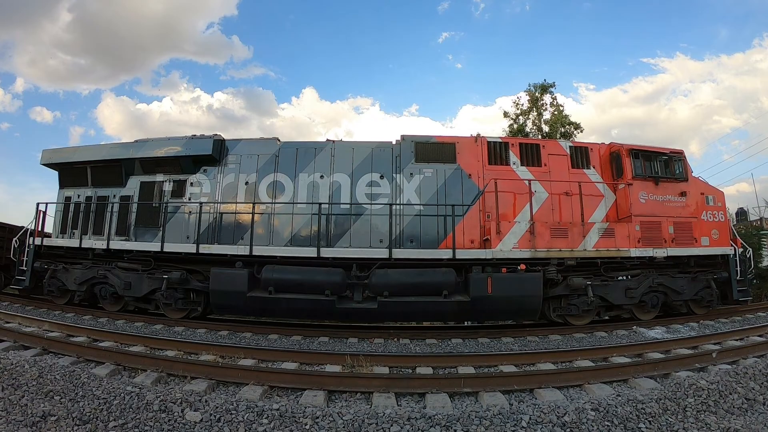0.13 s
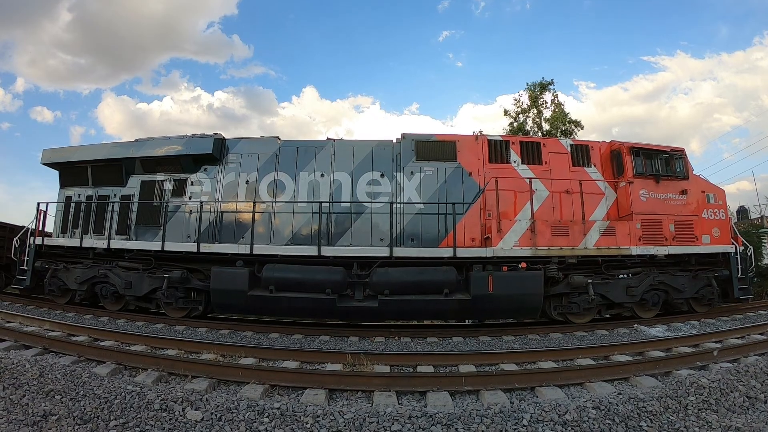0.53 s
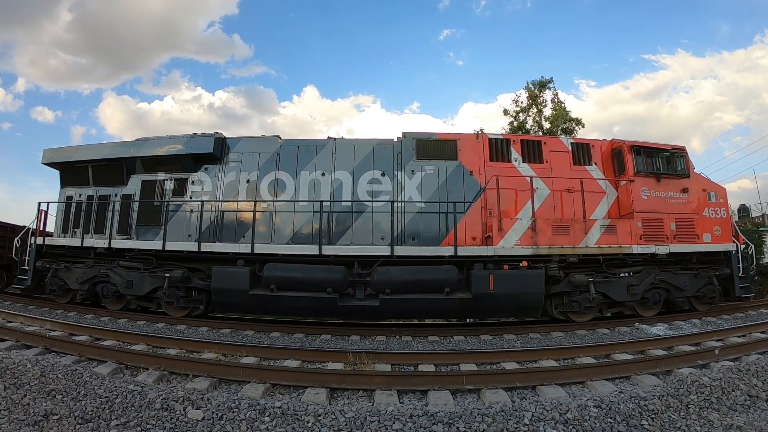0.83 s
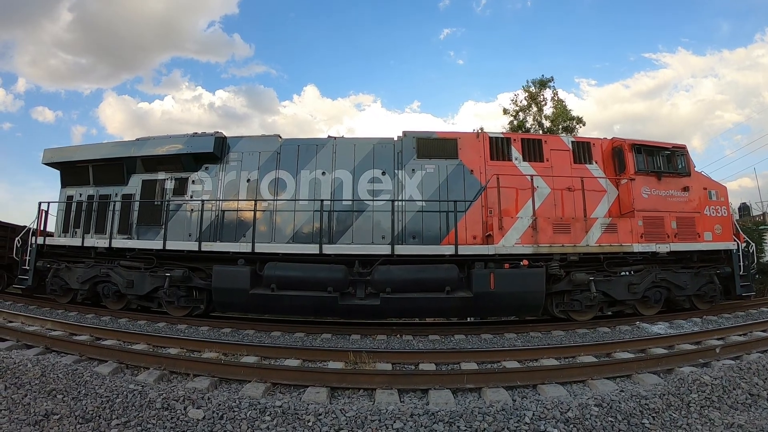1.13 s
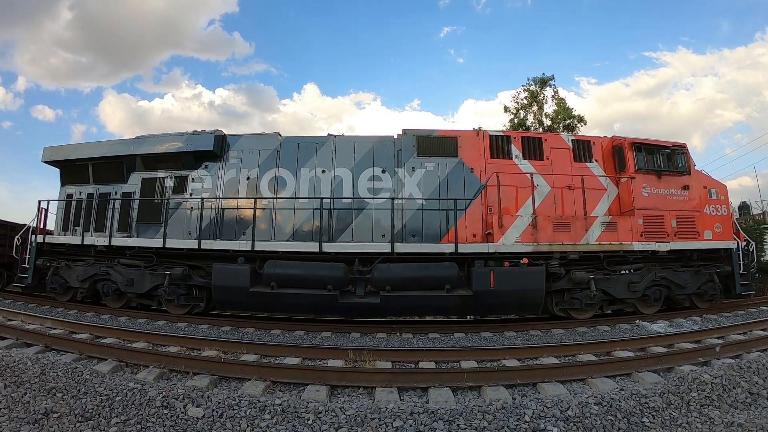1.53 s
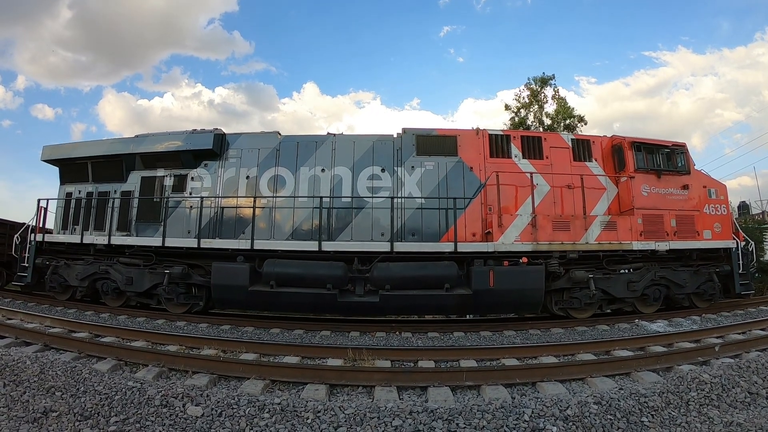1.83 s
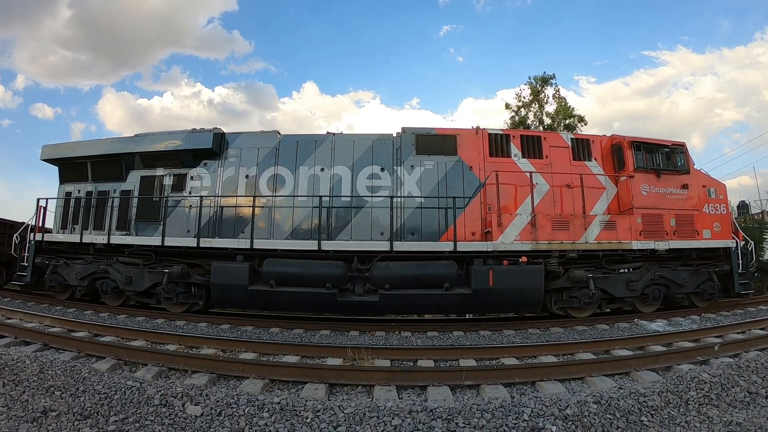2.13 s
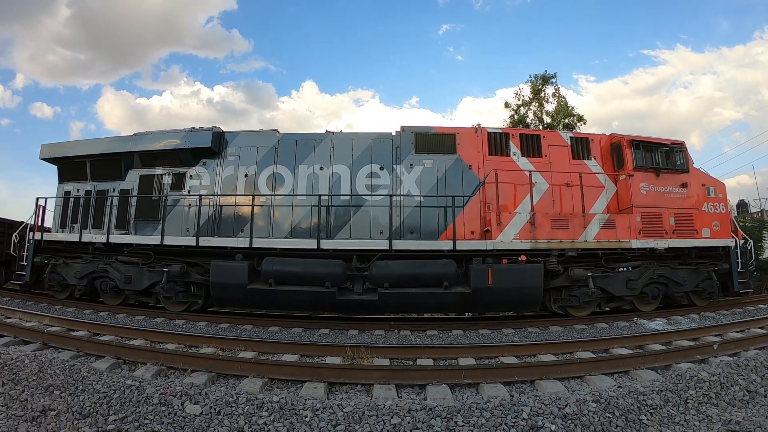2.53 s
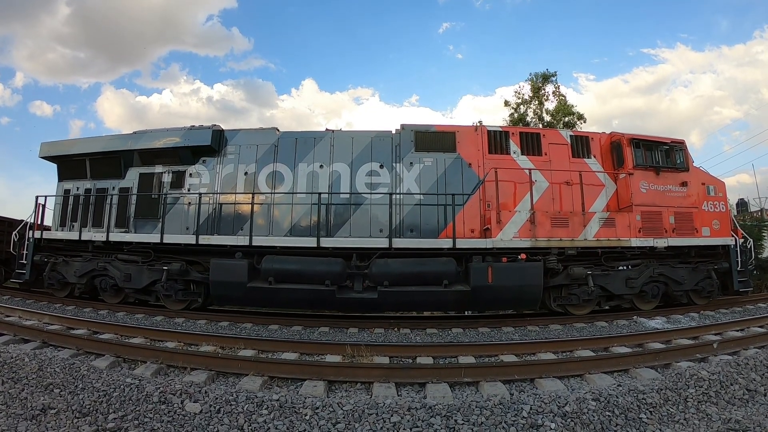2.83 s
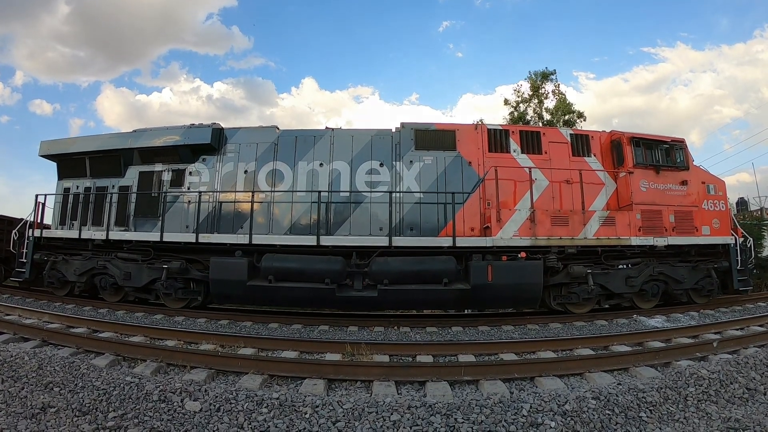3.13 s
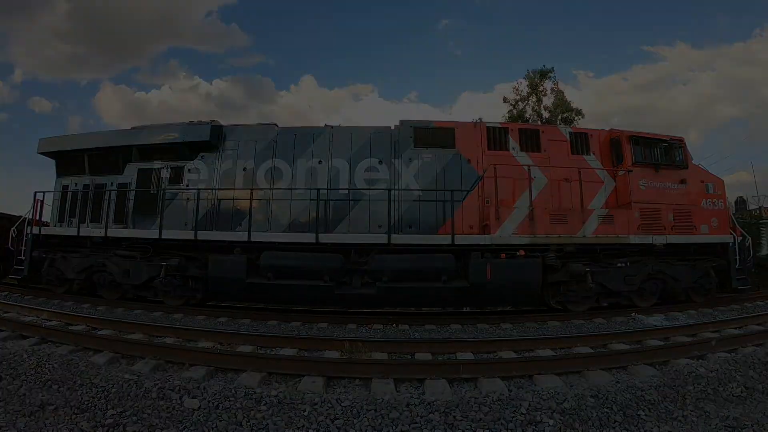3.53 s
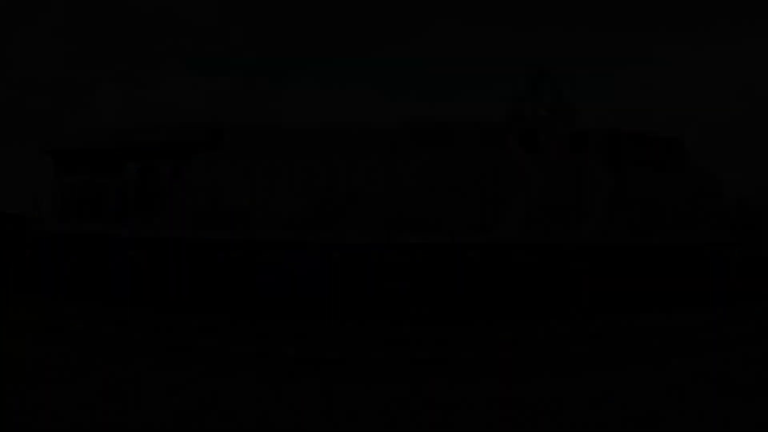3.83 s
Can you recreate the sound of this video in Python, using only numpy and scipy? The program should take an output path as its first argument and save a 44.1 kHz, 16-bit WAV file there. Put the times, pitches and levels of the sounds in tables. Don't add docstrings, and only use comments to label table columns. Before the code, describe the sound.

A diesel locomotive idles some metres away in an open rail yard. A loud compressed-air hiss sags and shuts off within half a second, leaving deep thrum, fan roar, valve clatter and wind thumps before a fade-out.

```python
import sys
import numpy as np
from scipy import signal
from scipy.fft import rfft, irfft
from scipy.io import wavfile
from scipy.ndimage import uniform_filter1d

SR = 44100
rng = np.random.default_rng(int(sys.argv[2]) if len(sys.argv) > 2 else 0)


def convert_level_to_amplitude(level_db):
    exponent = np.asarray(level_db, float) / 20
    return 10 ** exponent


def output_pcm(signal):
    pcm = np.clip(np.atleast_2d(signal).T, -1, 1) * 32767
    wavfile.write(sys.argv[1], SR, np.round(pcm).astype(np.int16))


N = 176400

CYCLE_HZ = 2.792

# freq_hz, density_db [dB per Hz]
AIR_COLOUR = [(290, -59), (500, -29), (956, -3), (2010, -6.5), (2310, -1.5), (2840, -11), (4870, -16.5),
              (11900, -45.5), (13500, -51.5)]
# freq_hz, width_hz, level_db
AIR_PIPE_MODES = [(951, 86, 4), (1122, 100, -7), (1496, 80, -3.5), (2287, 76, -0.5), (3400, 210, -7),
                  (3733, 45, -9.5), (4120, 49, -14), (4750, 130, -11), (6500, 48, -26), (6980, 53, -25)]
# time_s, pitch_hz, level_db
STACK_TONE = [(0, 54.5, -23), (.24, 52.43, -19), (.41, 52.23, -15), (.62, 52.47, -21.5), (.98, 51.5, -19),
              (1.25, 53.5, -19), (1.45, 53.02, -16), (1.6, 51.6, -21), (1.76, 52.16, -16),
              (1.881, 55.9, -28), (2.0, 52.75, -18.5), (2.16, 50.4, -22), (2.5, 53.12, -21),
              (2.84, 51.53, -19.5), (3.089, 50.5, -24.5), (3.3, 51.27, -20), (3.64, 52.3, -20),
              (4, 52, -25)]
# time_s, depth_db
TONE_LULLS = [(.34, -7), (.5, 0), (.58, -8), (.72, -9), (.84, -12), (.95, -15), (1.03, -11), (1.09, -9),
              (1.2, -8), (1.35, -10), (1.43, -13), (1.61, -11), (1.67, -10), (1.8, -10.5), (1.95, -6),
              (2.09, -13), (2.25, -7), (2.36, -12), (2.7, -12), (3.01, -14), (3.18, -11), (3.57, -7),
              (3.75, -8)]
# freq_hz, width_hz, level_db
STACK_MODES = [(34.7, 6, -10), (103.4, 25, -3.5), (245, 132, -9.5)]
# time_s, level_db
ROAR_LEVEL = [(.5, -35.5), (.7, -35), (1.0, -32.5), (1.15, -36.5), (1.57, -38.5), (2.0, -36), (2.3, -33.5),
              (2.6, -36), (2.91, -40), (3.2, -36.5), (3.45, -38), (3.62, -38), (3.75, -43), (4, -42)]
# freq_hz, density_db [dB per Hz]
HOOD_COLOUR = [(240, -17.5), (400, -1), (550, -9), (692, 1.5), (1030, -0.5), (1270, -9), (1550, -1.5),
               (1720, -7.5), (2100, -26.5), (2730, -48), (4620, -120)]
# freq_hz, width_hz, level_db
PANEL_MODES = [(734, 8.4, -20.5), (861, 10, -18.5), (1048.5, 6.1, -11), (1710, 43, -14.5), (1692, 32, -15)]
# freq_hz, density_db [dB per Hz]
CLATTER_COLOUR = [(1060, -28), (1800, -8), (2060, -5.5), (2360, -4.5), (3220, -6.5), (4910, -13.5),
                  (5620, -18.5), (8140, -31.5), (13500, -80)]
# time_s, lift_db
CLATTER_LIFT_DB = [(.5, 0.5), (.8, -0.5), (1.0, -2.5), (1.3, 0), (1.65, -1), (1.9, 0), (2.2, 0), (2.5, 0.5),
                   (2.9, -1.5), (3.3, 2.5), (3.6, 1), (3.85, -2)]
# freq_hz, width_hz, level_db
STRUCK_PARTS = [(2350, 110, -59), (4800, 250, -65), (3300, 250, -69)]
# multiple [of the gear rate], level_db
GEAR_PARTIALS = [(3, 0), (8, -36), (12, -44), (13, -37), (14, -42), (15, -46), (18, -56), (20, -60)]
# time_s, level_db
WHINE_LEVEL = [(.5, -46.5), (1.0, -46), (1.4, -40.5), (1.53, -45), (1.62, -42), (1.85, -43), (2.05, -39.5),
               (2.24, -51), (2.5, -43.5), (2.72, -47.5), (2.85, -41), (3.02, -42.5), (3.2, -36),
               (3.38, -45.5), (3.65, -46.5), (4, -50.5)]
# time_s, gust_db
GUST_LEVEL = [(0, -30), (.24, -28), (.42, -33.5), (.54, -25.5), (.7, -26.5), (.95, -28), (1.19, -19),
              (1.6, -28.5), (1.86, -25.5), (2.0, -29.5), (2.3, -27.5), (2.45, -22.5), (2.7, -25.5),
              (3.1, -33), (3.27, -35.5), (3.4, -24.5), (3.75, -28), (3.92, -37.5)]
# freq_hz, density_db [dB per Hz]
WIND_COLOUR = [(7.1, -36.5), (12, -8), (43, 0), (59, -1), (119, -8), (182, -20.5), (240, -19), (544, -38),
               (600, -42.5), (780, -67), (1320, -120)]
# time_s, peak_db, pitch_hz
WIND_PUFFS = [(0.061, -21.5, 72.6), (0.091, -23, 119), (.2, -20, 75), (.3, -19.5, 68.6), (1.54, -21.5, 135),
              (2.85, -22, 135), (.53, -11.5, 99), (0.659, -26, 119), (0.799, -17, 113), (.91, -18.5, 91),
              (1.151, -13.5, 75.5), (1.189, -27, 134), (1.281, -23, 106), (1.38, -26, 115), (1.5, -20, 100),
              (1.619, -20.5, 95), (1.86, -13.5, 97), (2.12, -27, 85), (2.25, -19.5, 92.6),
              (2.39, -12.5, 71.66), (2.44, -14.5, 100.5), (2.512, -14.5, 75), (2.567, -11, 89.6),
              (2.601, -14, 69.5), (2.781, -21, 109.2), (2.928, -19.5, 99.94), (3.442, -27.5, 75),
              (3.49, -18.5, 84.95), (3.73, -23, 78.5)]
# start_s, level_db, pitch_hz, ring_s [to -60 dB]
NEAR_KNOCKS = [
    (1.976, -20, 290, .03),
    (2.536, -34, 3100, .03),
    (2.271, -40, 3200, .02),
    (1.259, -40, 2800, .025),
    (3.6, -36, 600, .08),
    (.29, -33, 370, .05),
    (1.51, -30, 240, .05),
    (1.27, -30, 240, .06),
    (3.55, -32, 330, .1),
]
# freq_hz, gain_db
MIC_RESPONSE = [(6000, 0), (8100, 2), (9300, -5), (12000, -3.5), (12900, -12.5), (14200, -17), (15200, -32)]


def level(x, db):
    return x * convert_level_to_amplitude(db) / np.sqrt(np.mean(x ** 2))


def ring(x, hz, width_hz):
    b, a = signal.iirpeak(min(hz, .45 * SR), hz / max(width_hz, 1), fs=SR)
    return signal.lfilter(b, a, x)


def ring_twice(x, hz, width_hz):
    return ring(ring(x, hz, width_hz), hz, width_hz)


def noise():
    return rng.standard_normal(N)


def walk(rate_hz):
    hold = int(SR / rate_hz)
    held = np.repeat(rng.standard_normal(N // hold + 2), hold)
    return 1.27 * uniform_filter1d(uniform_filter1d(held, hold), hold)[:N]


def colour(x, points):
    hz, db = np.array(points, float).T
    edges = np.log2(hz)
    octave = np.log2(np.maximum(np.arange(N // 2 + 1) * SR / N, 1))
    outside = np.maximum(edges[0] - octave, 0) + np.maximum(octave - edges[-1], 0)
    return irfft(rfft(x) * convert_level_to_amplitude(np.interp(octave, edges, db) - 30 * outside), N)


def bands(points, flicker_db, rate_hz, per_octave=3):
    spectrum = rfft(level(colour(noise(), points), 0))
    octave = np.log2(np.arange(1, N // 2 + 2) * SR / N)
    low, high = np.log2(points[0][0]) - 1, np.log2(points[-1][0]) + 1
    for centre in np.arange(low, high, 1 / per_octave):
        weight = np.clip(1 - abs(octave - centre) * per_octave, 0, 1)
        yield 2 ** centre, irfft(spectrum * weight, N) * convert_level_to_amplitude(flicker_db * walk(rate_hz))


def turbulence(points, flicker_db, rate_hz):
    return sum(band for _, band in bands(points, flicker_db, rate_hz))


def curve(t, rows):
    return np.interp(t, *np.array(rows, float).T)


def beats(count, scatter_db):
    rate_hz = CYCLE_HZ * count
    times = .053 + np.arange(4.1 * rate_hz) / rate_hz
    draw = 2 * rng.random((400, 3))[:len(times)] - 1
    pattern = draw[np.arange(len(times)) % count, 1]
    size = convert_level_to_amplitude(scatter_db * (draw[:, 0] + pattern))
    at = np.clip((times + .003 * draw[:, 2]) * SR, 0, N + SR).astype(int)
    return np.bincount(at, size, N + 2 * SR)[:N]


def air_valve_db(t, eases_s):
    shuts_s = 0.444
    sag = -12.5 * t
    ease = -47.5 * np.maximum(t - eases_s, 0)
    shut = -500 * np.maximum(t - shuts_s, 0)
    return np.maximum(sag + ease + shut, -120)


def air(t):
    jet = turbulence(AIR_COLOUR, 0.63, 30)
    pipe = sum(level(ring(noise(), hz, width), db) * convert_level_to_amplitude(1.5 * walk(30))
               for hz, width, db in AIR_PIPE_MODES)
    hiss = jet + level(pipe, 1) * convert_level_to_amplitude(4.5 * np.minimum(t, 0.444))
    hiss = (hiss - 0.76 * ring(hiss, 2040, 350)) * convert_level_to_amplitude(-20)
    hiss = signal.sosfilt(signal.butter(3, 680, "high", fs=SR, output="sos"), hiss)
    low = signal.sosfiltfilt(signal.butter(2, 1900, fs=SR, output="sos"), hiss)
    treble = hiss - low
    return low * convert_level_to_amplitude(air_valve_db(t, eases_s=0.2)) + treble * convert_level_to_amplitude(air_valve_db(t, eases_s=0.281))


def exhaust(t):
    s, hz, db = np.array(STACK_TONE, float).T
    pitch_hz = np.interp(t, s, hz) * (1 + .02 * walk(6))
    tone = np.sin(2 * np.pi * np.cumsum(pitch_hz) / SR) * convert_level_to_amplitude(1.3 * walk(8))
    skirt = ring_twice(noise(), hz.mean(), 10.4)
    lull_s = 0.013
    lull_db = sum(depth_db * np.exp(-((t - at) / lull_s) ** 2) for at, depth_db in TONE_LULLS)
    thrum = (level(tone, -0.67) + level(skirt, -14)) * convert_level_to_amplitude(np.interp(t, s, db) + lull_db)
    firings = beats(count=12, scatter_db=2.5)
    rung = sum(level(ring_twice(firings, f, width), g) for f, width, g in STACK_MODES)
    return thrum + level(rung, -38.5)


def valve_gate():
    decay_s, rise_s = .025, .014
    knock = beats(count=6, scatter_db=2.2)
    tail = signal.lfilter([1], [1, -np.exp(-1 / (decay_s * SR))], knock)
    return uniform_filter1d(0.5 + .17 * tail, int(rise_s * SR))


def fan_roar():
    roar = turbulence(HOOD_COLOUR, 0.9, 2.5)
    panels = sum(level(ring(noise(), hz, width), db) * convert_level_to_amplitude(1.5 * walk(2))
                 for hz, width, db in PANEL_MODES)
    return roar + panels


def valve_clatter(gate):
    clatter = level(gate * turbulence(CLATTER_COLOUR, 1.2, 6.07), -51)
    struck = gate ** 3 * noise()
    for hz, width, db in STRUCK_PARTS:
        part = ring(ring(struck, hz, 2 * width), hz, width)
        clatter = clatter + level(part * convert_level_to_amplitude(4.3 * walk(5.7)), db)
    return clatter


def gear_whine(t):
    turn = 2 * np.pi * np.cumsum(507.1 * (1 + 0.00037 * walk(2))) / SR
    whine = 0
    for multiple, db in GEAR_PARTIALS:
        gain = np.sqrt(2) * convert_level_to_amplitude(db + curve(t, WHINE_LEVEL) + 1.6 * walk(25))
        whine = whine + gain * np.sin(round(multiple) * turn)
    return whine


def hood(t):
    roar_db, breeze_db = curve(t, ROAR_LEVEL), 1.1 * walk(14)
    gate = valve_gate()
    roar = level(fan_roar() * np.sqrt(gate), 0) * convert_level_to_amplitude(roar_db + breeze_db / 2)
    clatter_db = 0.28 * (roar_db + 38.0) + curve(t, CLATTER_LIFT_DB) + breeze_db
    return roar + valve_clatter(gate) * convert_level_to_amplitude(clatter_db) + gear_whine(t)


def wind(t):
    gust_db = curve(t, GUST_LEVEL) + 26
    rumble = 0
    for hz, band in bands(WIND_COLOUR, 1.62, 9):
        share = .65 if hz < 60 else 1
        trim_db = -12.5 if 44 < hz < 62 else 0
        rumble = rumble + band * convert_level_to_amplitude(gust_db * share + trim_db)
    return convert_level_to_amplitude(-21) * rumble


def puffs(t):
    out = np.zeros(N)
    for s, db, hz in WIND_PUFFS:
        turns = (t - s) * hz
        swell = np.exp(-(turns / 1.9 - .5) ** 2)
        sagging = turns * (1 - .15 * np.tanh(turns / 4))
        out += convert_level_to_amplitude(db - 2.0) * swell * np.sin(2 * np.pi * (sagging + rng.random()))
    return out


def knocks(t):
    out = 0
    for s, db, hz, ring_s in NEAR_KNOCKS:
        age = np.maximum(t - s, 0)
        rough = level(ring_twice(noise(), hz, hz / 2), -3)
        body = np.sin(2 * np.pi * hz * age) + rough
        out = out + convert_level_to_amplitude(db - 60 * age / ring_s) * np.minimum(age / .002, 1) * body
    return out


def scene():
    t = np.arange(N) / SR
    return (air(t) + exhaust(t) + hood(t) + wind(t) + puffs(t) + knocks(t))[None]


def low_pass(x):
    return signal.sosfilt(signal.butter(12, 15720, fs=SR, output="sos"), x)


def record(dry):
    t = np.arange(N) / SR
    hiss = convert_level_to_amplitude(-91.5) * noise()
    x = colour(dry[0] + hiss, [(1, 0.0097)] + MIC_RESPONSE)
    x = signal.sosfilt(signal.butter(2, 18, "high", fs=SR, output="sos"), x)[None]
    frame_s, grid_s = 1 / 29.97, 2.7348
    frame_start = grid_s + frame_s * np.floor((t - grid_s) / frame_s)
    fade_from_s, fade_to_s = 2.5, 4.11
    fade = np.clip((fade_to_s - frame_start) / (fade_to_s - fade_from_s), 0, 1)
    return low_pass(x * fade)


dry = scene()
out = record(dry)
output_pcm(out)
```